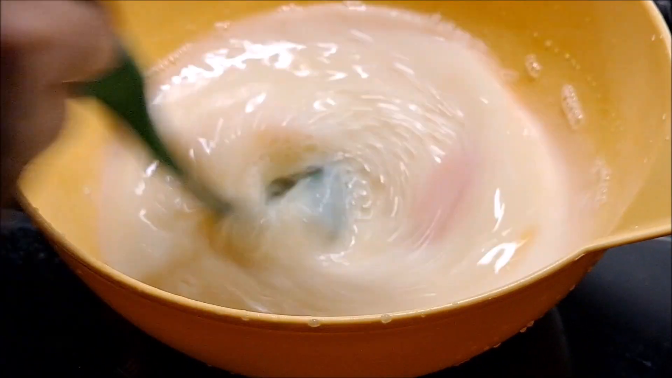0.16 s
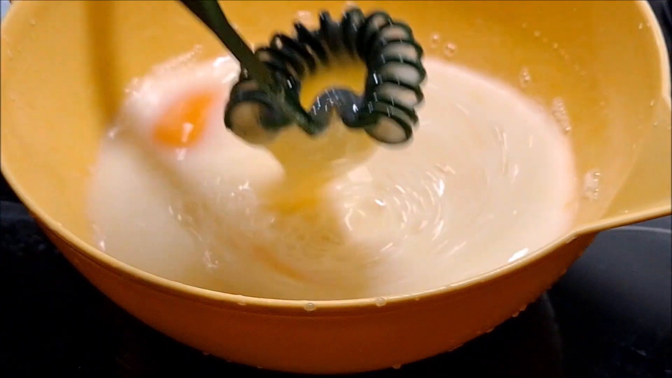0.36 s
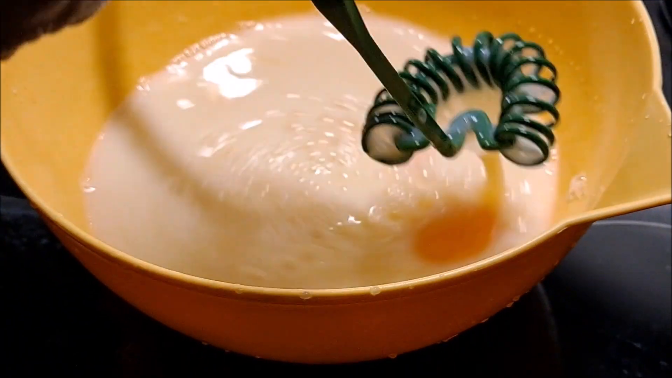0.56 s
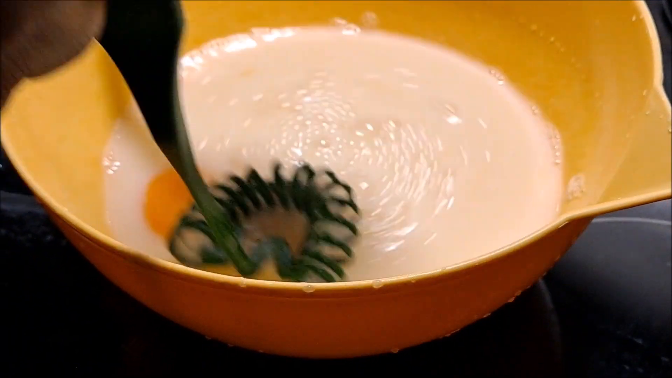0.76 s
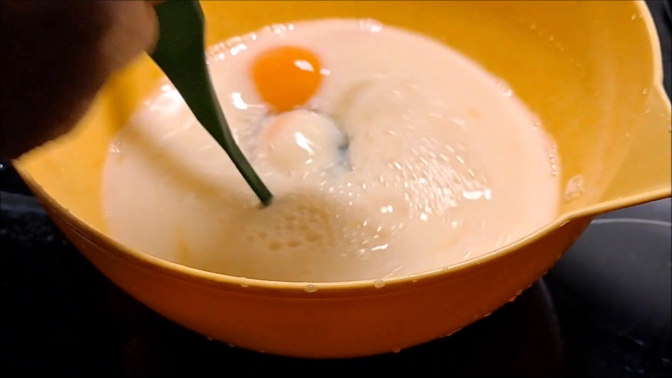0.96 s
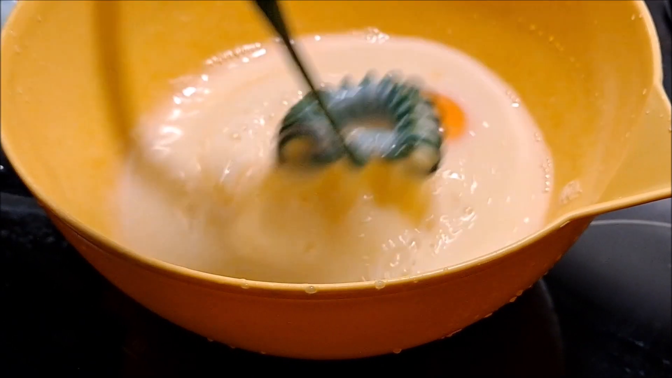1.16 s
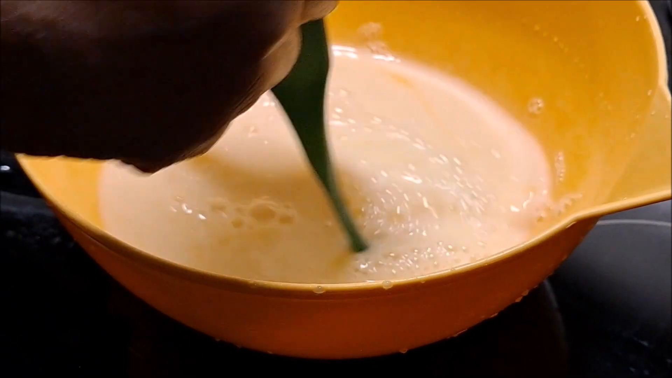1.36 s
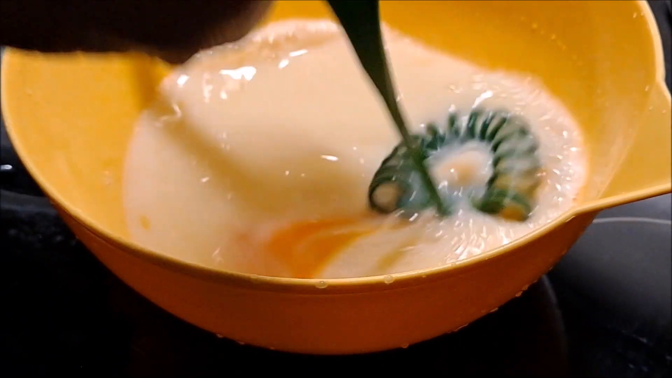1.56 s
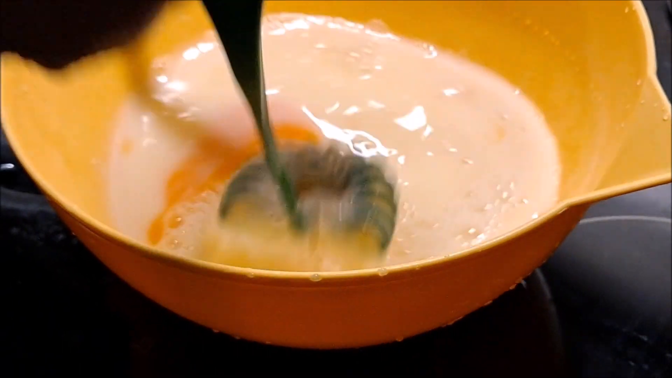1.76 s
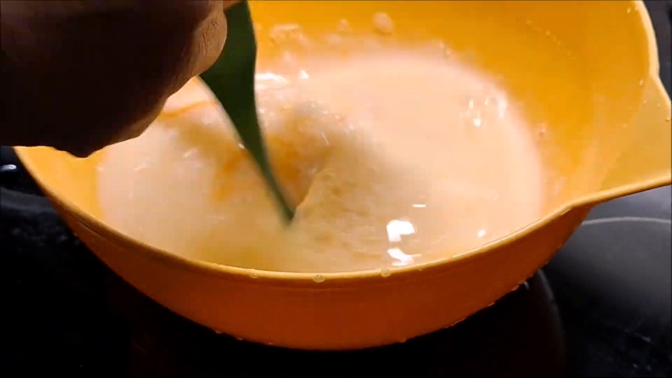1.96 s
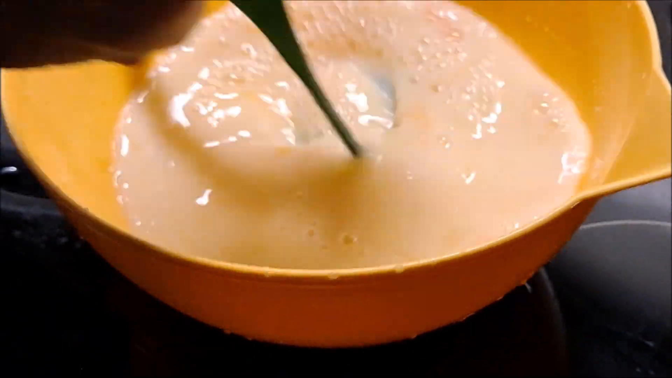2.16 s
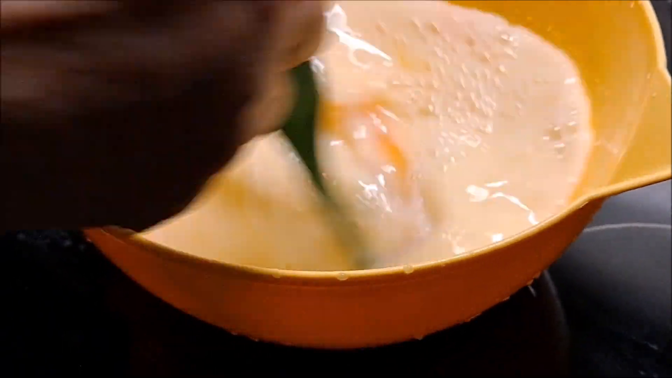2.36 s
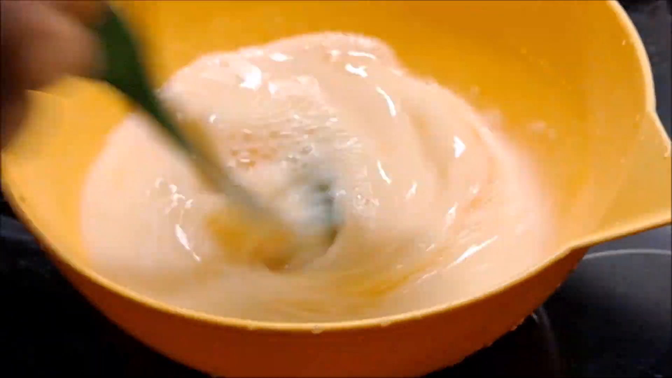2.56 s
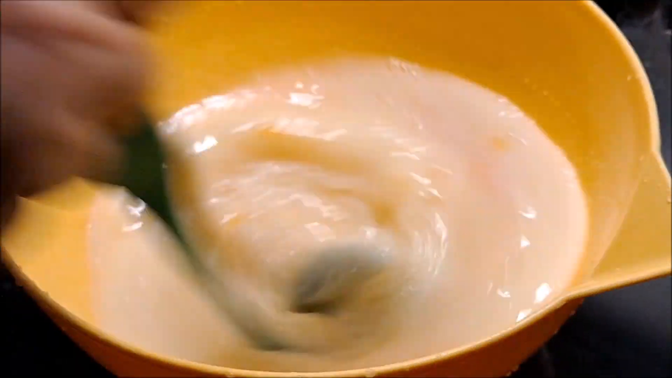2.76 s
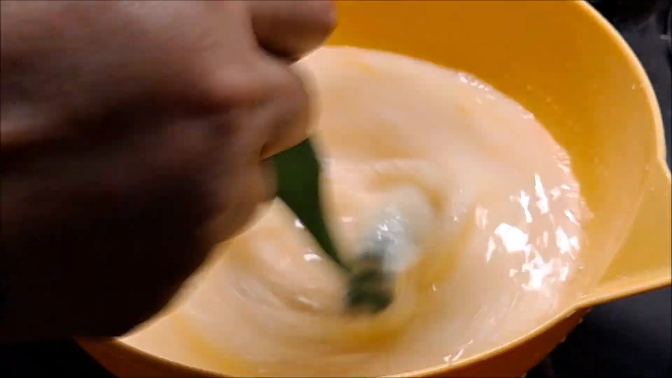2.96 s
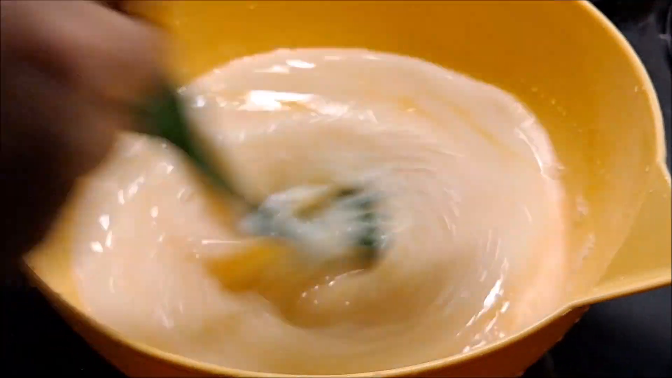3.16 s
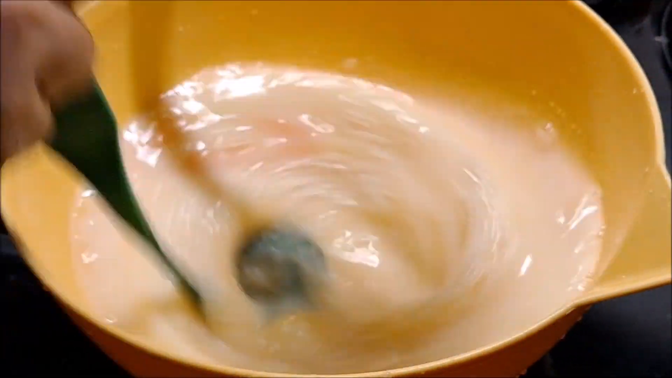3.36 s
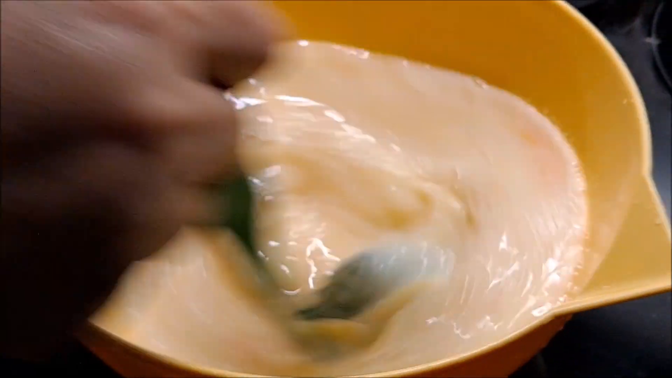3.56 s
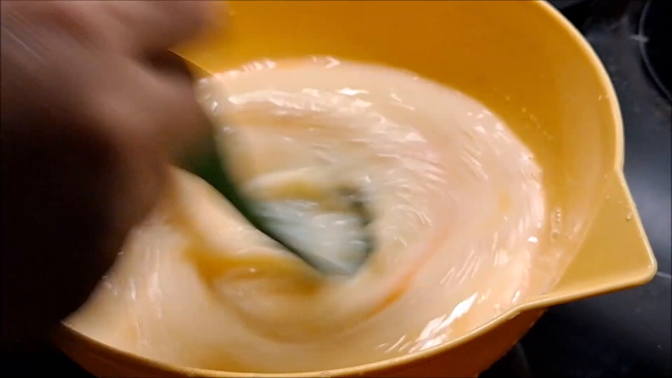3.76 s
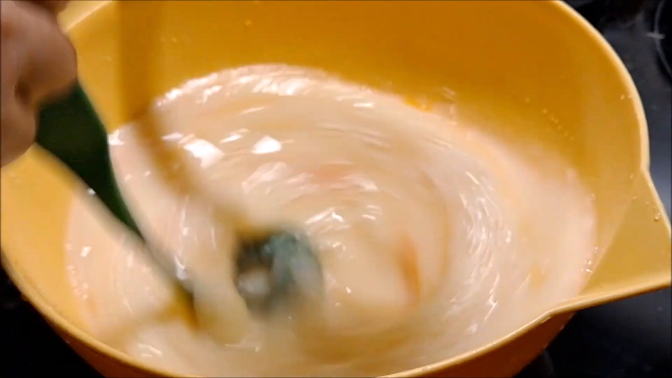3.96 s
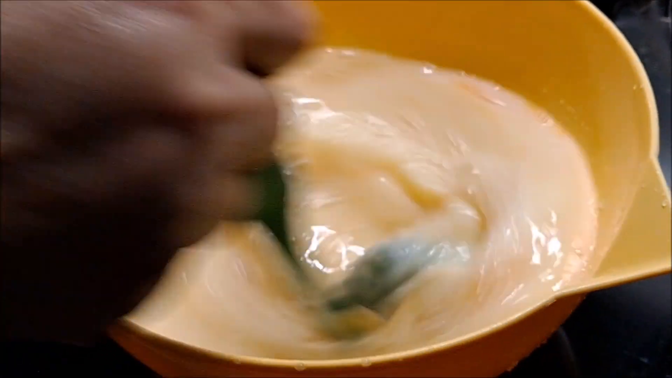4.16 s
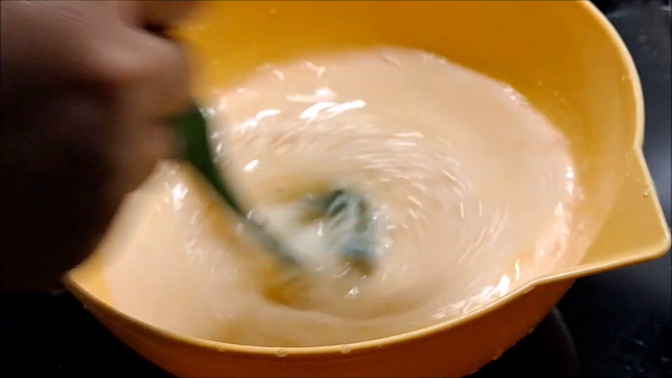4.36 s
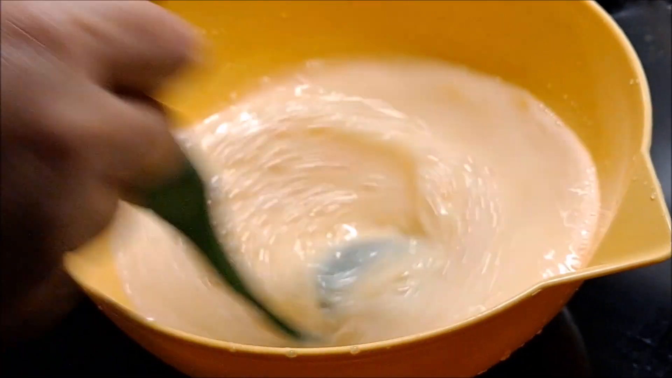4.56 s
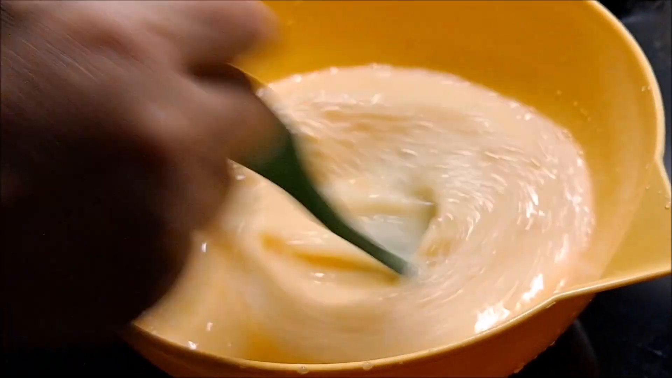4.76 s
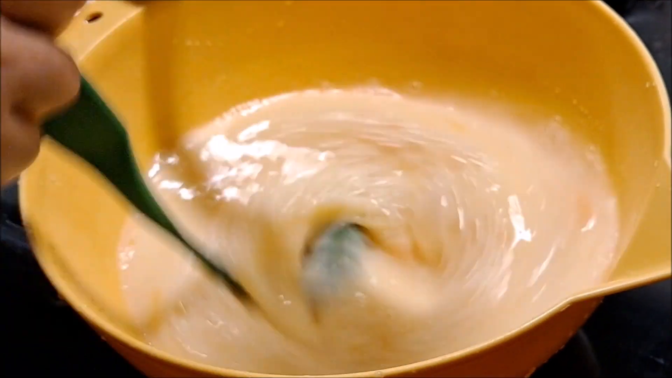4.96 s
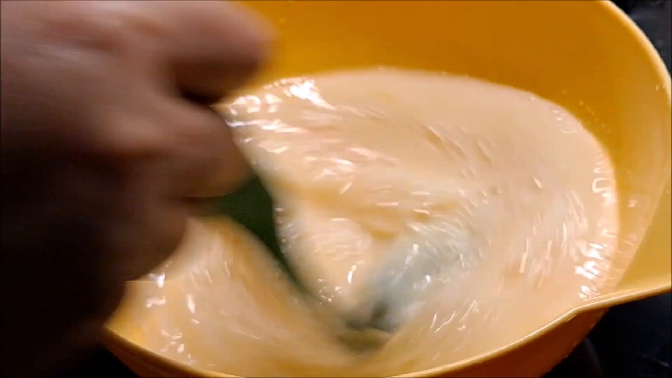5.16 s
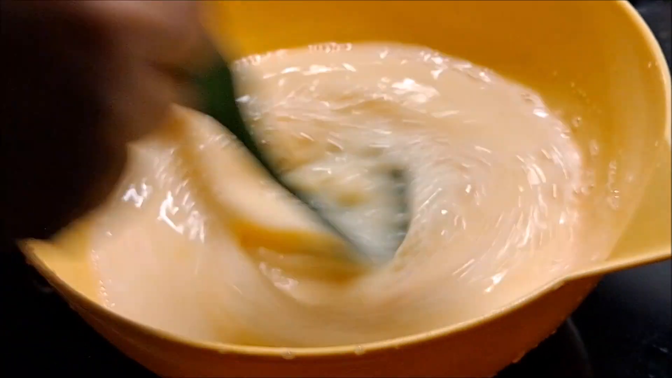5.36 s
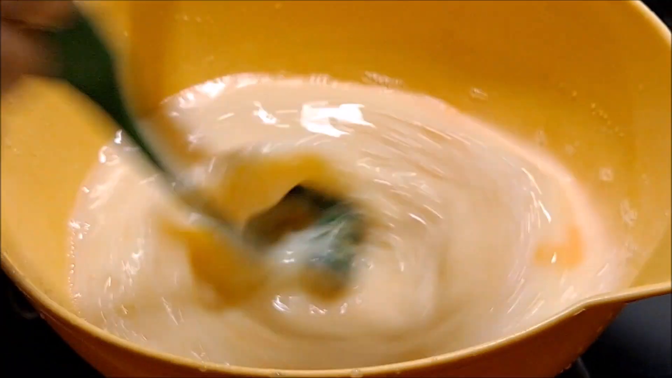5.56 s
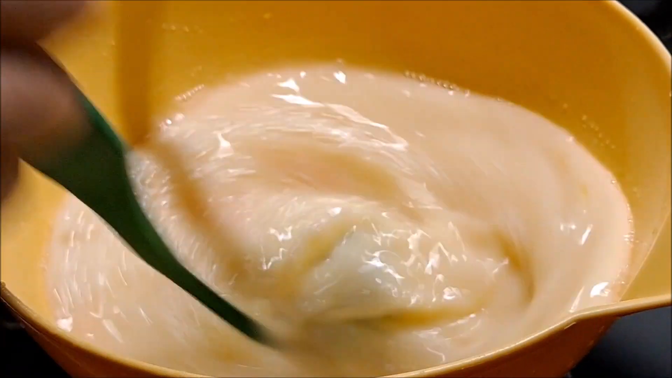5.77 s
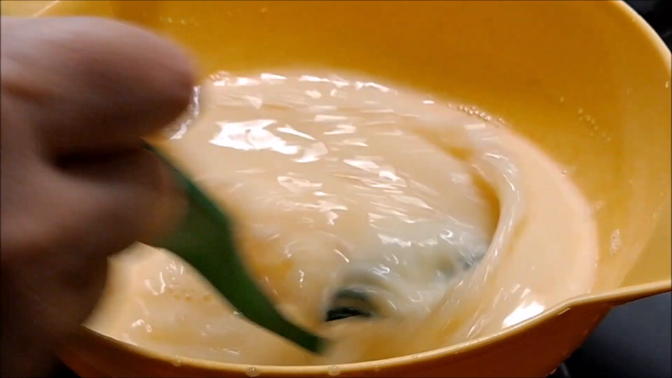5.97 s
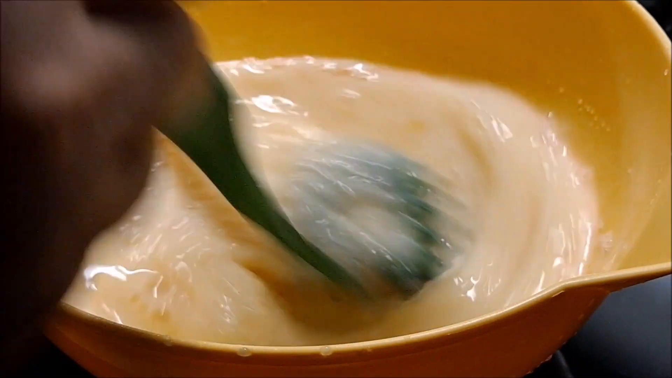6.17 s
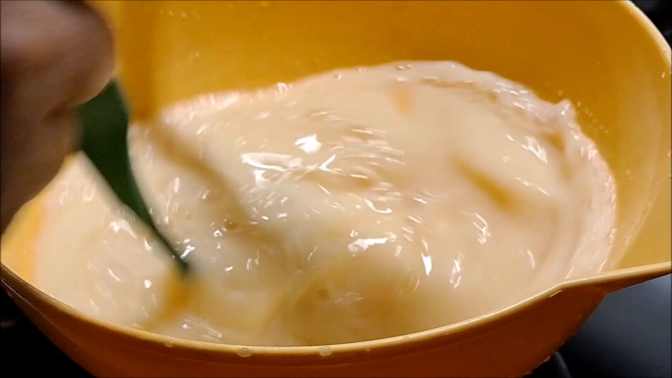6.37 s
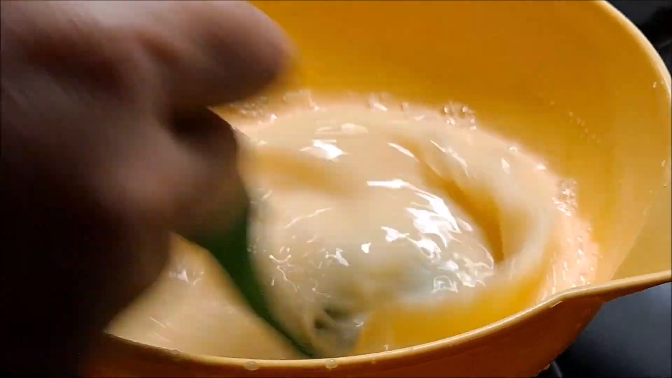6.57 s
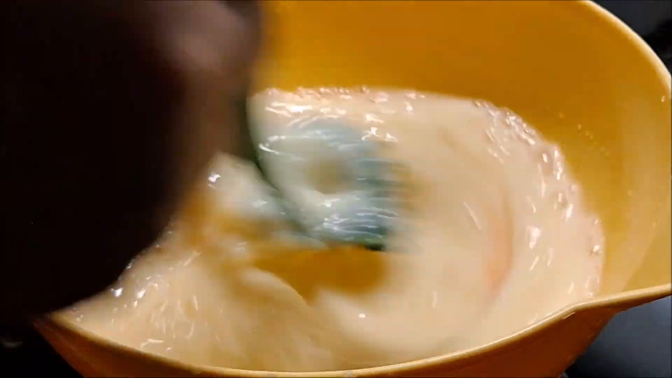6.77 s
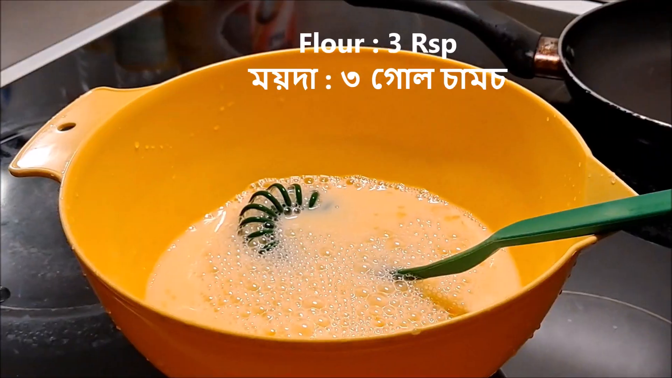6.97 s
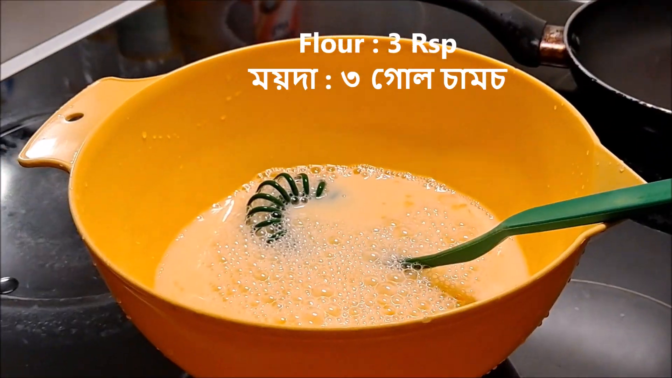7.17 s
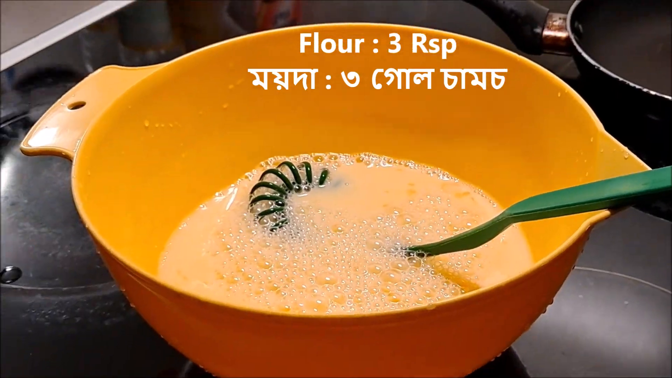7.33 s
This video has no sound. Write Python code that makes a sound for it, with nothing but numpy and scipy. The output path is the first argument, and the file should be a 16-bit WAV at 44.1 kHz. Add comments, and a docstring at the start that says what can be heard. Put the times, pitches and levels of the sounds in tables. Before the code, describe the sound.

A plastic whisk beats eggs and milk in a plastic bowl, with quick scrapes, rattling knocks and small wet glops.

```python
"""A coiled plastic whisk beats eggs and milk in a plastic bowl on a hob, heard close up in stereo. The coil
scrapes the wall and its loops knock it many times a second. Trapped air glops, and the bowl thuds against the
hob. Behind it a kitchen rumbles and whines faintly. Near the end the scene changes: the whisking is gone, a
different background takes over, and the resting bowl gives two faint clicks."""
import sys
import numpy as np
from scipy import signal
from scipy.fft import rfft, irfft, next_fast_len
from scipy.io import wavfile
from scipy.ndimage import uniform_filter1d, map_coordinates

SR = 44100
rng = np.random.default_rng(int(sys.argv[2]) if len(sys.argv) > 2 else 0)


def materialize(psi):
    """Save the field psi as 16-bit PCM at rate SR to the path in sys.argv[1].

    A 1-D psi becomes a single channel; in a 2-D psi each row is a channel.
    """
    bounded = np.clip(np.atleast_2d(psi).T, -1, 1)
    quanta = np.round(bounded * 32767).astype(np.int16)
    wavfile.write(sys.argv[1], SR, quanta)


N = 326325

# Levels in the tables are relative: the functions set the final loudness.
# Loops hitting the wall: t/s, tick level/dB, knock above tick/dB, treble above tick/dB, air pocket f/Hz
LOOP_KNOCKS = [(0.177, -19, -17.5, -10.5, 1350), (0.2367, -28.5, -9, -16, 890), (0.492, -74, -30, 3, 1500),
               (0.7213, -49, -38, -10.5, 1070), (1.0154, -36.5, -7, -1, 790),
               (1.338, -40.5, -26, -12, 1630), (1.367, -42, -17, -14, 870), (1.6831, -33, -12.5, -11, 745),
               (1.9624, -32.5, -1.5, -4, 1304), (2.0151, -32, -7.5, -31, 1560),
               (2.1955, -35, -45, -18, 1500), (2.2134, -36, -26, -15.5, 1500),
               (2.3216, -30.5, -23, -8, 1500), (2.339, -29.5, -3.5, -18.5, 910),
               (2.377, -28, -7, -7.5, 2000), (2.4357, -36, -21, -6, 1500), (2.4736, -25.5, -8, -14.5, 1620),
               (2.5077, -20, -13.5, -16, 1320), (2.542, -31, -18, -19, 1380),
               (2.6038, -36.5, -12.5, -15, 1300), (2.711, -25.5, -17, -16, 730),
               (2.753, -32.5, -6, -5.5, 1600), (2.779, -30.5, -9, -3, 1300), (2.8165, -30, -16, -8.5, 1500),
               (2.8603, -23.5, -15.5, -9.5, 1500), (2.8893, -20.5, -10, -12, 1590),
               (2.9853, -17.5, -19.5, -14, 980), (3.003, -24.5, -18.5, -18.5, 1500),
               (3.096, -26.5, -4, -6.5, 1190), (3.174, -26.5, -43, -6.5, 1500),
               (3.2047, -29.5, -2, -10, 1460), (3.237, -24, -14.5, -11.5, 1500),
               (3.295, -23, -15, -14, 1600), (3.3363, -20.5, -7.5, -16.5, 930),
               (3.3956, -34.5, -30, -18.5, 1500), (3.4489, -27.5, -23, -12, 1500),
               (3.465, -21.5, -14, -11, 1620), (3.511, -23.5, -14.5, -6, 1620),
               (3.5483, -29.5, -25, -5.5, 1500), (3.5643, -13, -10.5, -15, 1020),
               (3.6575, -32, -20.5, -10.5, 1500), (3.688, -12, -18.5, -21.5, 980),
               (3.7862, -22.5, -26, -11.5, 1500), (3.8001, -15, -18, -23.5, 1000),
               (3.826, -21.5, -18, -12, 1320), (3.903, -29.5, -15, -23.5, 1500),
               (3.929, -16, -13.5, -31.5, 1080), (3.9484, -15.5, -25.5, -16.5, 1370),
               (4.0136, -22.5, -25, -8.5, 1580), (4.0353, -22.5, -22, -19, 1500),
               (4.049, -19, -34, -23.5, 1640), (4.0626, -26.5, -16, -3, 1570),
               (4.1705, -12.5, -18, -31, 1880), (4.2774, -21.5, -7.5, -17.5, 1040),
               (4.3087, -24, -23, -10, 1890), (4.4266, -25, -13.5, -18.5, 1000),
               (4.4444, -24, -16, -9, 1460), (4.5591, -31.5, -18, -23.5, 1500),
               (4.576, -22.5, -10.5, -7.5, 1560), (4.6807, -28.5, -23.5, -20, 1500),
               (4.6978, -20, -27, -12, 1930), (4.783, -22, -13.5, -15, 1710), (4.819, -27.5, -8, -4, 1700),
               (4.8448, -28, -7, -21.5, 1430), (4.926, -29, -6.5, -19.5, 950),
               (4.9456, -21.5, -13.5, -15, 1380), (5.012, -25.5, -11.5, -6.5, 1660),
               (5.051, -18.5, -15, -22, 740), (5.0706, -24, -8.5, -7, 1620), (5.1223, -24, -19, -10, 1500),
               (5.146, -23.5, -10, -18, 1590), (5.168, -23, -13.5, -17.5, 1500),
               (5.19, -26, -13, -6.5, 1470), (5.3117, -20, -27, -15.5, 1710),
               (5.3664, -23, -14, -16.5, 1870), (5.431, -23.5, -15.5, -7.5, 1370),
               (5.486, -21.5, -17.5, -11, 1170), (5.55, -13.5, -19.5, -12, 1340),
               (5.601, -23.5, -13.5, -16, 1500), (5.6585, -20.5, -26, -9.5, 2000),
               (5.668, -16.5, -16.5, -11.5, 1570), (5.6871, -21, -8, -18, 1060),
               (5.7175, -19.5, -16, -13, 1690), (5.758, -32, -6, -13, 1430), (5.7803, -23, -12, -7.5, 1500),
               (5.7861, -14, -6, -7, 1426), (5.8006, -20.5, -5.5, -11, 1294),
               (5.8428, -23, -15.5, -12, 1740), (5.8967, -16, -11, -8.5, 1520),
               (5.9125, -12, -9.5, -12, 1070), (5.9553, -22, -17, -11, 1500),
               (6.008, -24.5, -8.5, -1.5, 1576), (6.0181, -12, -10.5, -16, 1360),
               (6.0326, -33.5, 9, -18.5, 1590), (6.0551, -23.5, -16.5, -14, 1500),
               (6.119, -31, -1, -10, 1610), (6.1383, -14.5, -8.5, -11, 1040), (6.238, -28.5, 3, -13, 1690),
               (6.255, -27.5, -1.5, -2.5, 1350), (6.284, -30, -11.5, -11.5, 1400),
               (6.3605, -17, -19.5, -8, 1330), (6.3805, -21.5, -2.5, -25, 944),
               (6.477, -34.5, -16.5, -25.5, 1500), (6.4893, -22, -13.5, -7, 1370),
               (6.595, -25.5, -9, -6, 1570), (6.6138, -19.5, -4.5, -10, 1550),
               (6.634, -29, -17, -12.5, 1700), (6.73, -20, -10, -10, 1500), (6.7409, -17, -6, -17.5, 1064),
               (6.776, -30, -2.5, -14, 1500), (6.8549, -16.5, -18, -6.5, 1540),
               (6.8694, -17.5, -7, -8, 1408)]
# Faint clicks from the resting bowl: same columns
RESTING_CLICKS = [(7.038, -48, 0, -3, 580), (7.137, -65.5, -11, 3.5, 593)]
# Strokes along the wall, and three light early drips:
# t/s, length/s, scrape level/dB, wall above scrape/dB, rumble above scrape/dB
STROKES_AND_DRIPS = [(0.001, 0.33, -41, -2, -5.5), (0.062, 0.091, -38.5, -5, -10),
                     (0.183, 0.073, -33.5, -4.5, -14.5), (0.734, 0.023, -64.5, -43, 6.5),
                     (0.965, 0.004, -62.5, -29, -14), (1.015, 0.003, -50, -1, 11.5),
                     (1.08, 0.013, -45.5, -3.5, -7.5), (1.302, 0.03, -57, -32, -3.5),
                     (1.357, 0.1, -57.5, 1, -1), (1.425, 0.018, -48.5, -1, 2.5),
                     (1.691, 0.003, -48, 3.5, 6), (1.735, 0.02, -51, -2.0, -10),
                     (1.96, 0.049, -47, 3.5, 2.5), (2.021, 0.017, -46, -5.5, -7),
                     (2.2, 0.084, -44, -5.5, -19), (2.315, 0.038, -38.5, -2.5, -29),
                     (2.437, 0.045, -39.5, -5.5, -18.5), (2.532, 0.028, -45, -1.5, -10.5),
                     (2.628, 0.0097, -36.5, 0, -7.5), (2.751, 0.182, -41, -0.5, -5),
                     (2.828, 0.12, -35.5, -2, -5), (2.976, 0.098, -38.5, -0.5, 0),
                     (3.102, 0.011, -32, -6.5, -3.5), (3.152, 0.13, -34, -2.5, -8),
                     (3.323, 0.095, -33, -4, -5), (3.442, 0.24, -37, -3.5, -10.5),
                     (3.568, 0.012, -31.5, -8.5, -2), (3.694, 0.085, -36.5, -4.5, -4.5),
                     (3.815, 0.0077, -31, -6.5, -1), (3.887, 0.082, -34.5, -7, -12.5),
                     (4.042, 0.24, -38.5, 0, -10), (4.157, 0.088, -36, -2, -11),
                     (4.292, 0.03, -37, -2, -22), (4.416, 0.011, -42, 4.5, -2),
                     (4.555, 0.016, -36, -5, -11), (4.68, 0.083, -40.5, -25, -1.5),
                     (4.792, 0.015, -36.5, -3, -18), (4.946, 0.093, -44.5, -1.5, -1.5),
                     (5.03, 0.11, -41, -4.5, -25), (5.141, 0.11, -35, -5.5, -9),
                     (5.302, 0.14, -38.5, -3, -5), (5.415, 0.092, -38.5, -1.5, -10),
                     (5.535, 0.076, -37, -1.5, -10.5), (5.662, 0.25, -36, -6.5, -7),
                     (5.785, 0.0083, -25.5, -4, -9.5), (5.906, 0.0086, -30.5, 1.5, -5.5),
                     (6.018, 0.074, -38, -10, -3.5), (6.13, 0.047, -33.5, -0.5, -10),
                     (6.237, 0.049, -34, -4, -4), (6.363, 0.044, -33, -5, -8),
                     (6.482, 0.035, -32.5, -4, -3.5), (6.605, 0.054, -32.5, -5.5, -5),
                     (6.724, 0.074, -34, -7, -14), (6.859, 0.1, -36.5, -4, -1.5)]
# The mix swirling between strokes: t/s, scrape level/dB, wall above scrape/dB, rumble above scrape/dB
MIX_SWIRL = [(2.15, -77, -8, 16), (2.3, -46, -1.5, -14), (2.6, -40.5, -6.5, -2.5), (3.2, -50, -2, -12.5),
             (3.9, -38, -4.5, -5.5), (4.5, -42, -3, -7), (5.1, -42, 1, -1), (5.5, -54.5, -18.5, -14.5),
             (5.9, -43.5, -1, -3.5), (6.1, -57, -0.5, -28.5)]
# Four pitches ("modes") of the coil's main ring, then three close ringing pitches near 4.3 kHz:
# f/Hz, width/Hz, level/dB
COIL_MODES = [(2490, 90, 0.5), (2730, 147, 4.5), (3190, 1340, -1), (5730, 2740, -8), (4125, 240, 6),
              (4330, 130, 9), (4477, 120, 6.5)]
# How freely the three close pitches ring when out of the mix, which muffles them: t/s, level/dB
COIL_FREEDOM = [(0, 0.5), (.75, 7), (1.1, 0.5), (1.7, 2.5), (2.3, 0), (2.7, 2), (2.95, 5), (3.15, -1),
                (3.5, 1.5), (3.8, 1.5), (4.1, 0), (4.4, 4), (4.6, 2), (4.7, -2.5), (4.8, 8.5), (5, 1),
                (5.3, 1), (5.6, 0), (5.8, -3), (6.1, -2.5), (6.4, -0.5), (6.7, -6), (6.9, 2)]
# Pitches the bowl's wall rings at: f/Hz, width/Hz, level/dB
WALL_MODES = [(562, 192, -9), (730, 100, -3), (952, 175, -4), (1253, 257, -2), (1424, 166, 0),
              (1607, 54, 3), (1930, 334, -3.5)]
# Low pitches of the bowl on the hob: f/Hz, width/Hz, level/dB
BASE_MODES = [(137.3, 36.5, -1), (175.3, 25, 1.5), (213.5, 36, 1.5), (272.4, 14.1, 0), (326, 32, -8.5)]
# Dry treble of plastic touching plastic: f/Hz, level/dB
FIZZ_SPECTRUM = [(2940, -24.5), (5000, 0.5), (8970, -5), (11900, -12.5), (13500, -11), (16000, -14.5)]
# How alike the whisk sounds on the left and right: f/Hz, likeness (1 = the same)
WHISK_LIKENESS = [(60, 0.79), (180, 1), (550, 0.88), (1650, 0.59), (4970, 0.19), (15000, 0.15)]
# How much louder the whisk is on the left: f/Hz, level/dB
WHISK_BALANCE = [(60, -4), (380, 0.5), (2380, 2.5), (15000, 1.5)]
# Kitchen noise during the whisking: f/Hz, level/dB
KITCHEN_DURING = [(25, -38.5), (60, -32.5), (90, -17.5), (130, -7.5), (217, -5), (340, -12.5), (520, -21),
                  (900, -35), (1500, -44.5), (5000, -44.5), (16000, -53)]
# Kitchen noise after the scene changes: f/Hz, level/dB
KITCHEN_AFTER = [(25, -34), (60, -16), (150, 0.5), (230, 0.5), (500, -12), (1100, -19.5), (1500, -27.5),
                 (3500, -28), (5200, -26.5), (7500, -32.5), (10500, -28.5), (16000, -38)]
# How alike the kitchen sounds on the left and right: f/Hz, likeness (1 = the same)
KITCHEN_LIKENESS = [(60, 1), (290, 0.94), (1400, 0.33), (3100, 0)]
# How much louder the kitchen is on the left: f/Hz, level/dB
KITCHEN_BALANCE = [(60, -6.5), (200, -7.5), (700, -2), (2000, 0.5)]
# Thin tones of appliances: f/Hz, level/dB, wavering/dB
APPLIANCE_TONES = [(1086, -87, .5), (5722, -94, 4), (9550, -104, 1)]

SCENE_CHANGE_S = 6.929  # the scene changes here: the whisking gives way to a quieter scene
ATTACK_DB_PER_S, SAG_DB_PER_S, RELEASE_DB_PER_S = 1758.5, 39, 406.5  # a scrape starts, drags, lets go
LIFT_S, LIFT_WIDTH_S, LIFT_DB = 0.0096, 0.007, -1  # the coil lifts just before a stroke: a small dip
KNOCK_RISE_S, KNOCK_FALL_S, CLICK_S = 0.002, 0.0019, 0.00061  # time to swell or fade by 2.43 dB
HOLLOW_HZ, RUMBLE_TOP_HZ, TOP_HZ = 985, 700, 15900


def whisk():
    """Scrapes and knocks make a rough force that rings the coil, the bowl's wall and its base."""
    scrape, hiss, rub, rumble = stirring()
    slips = chatter(per_s=110, spread_db=-1.5, fade_s=0.043, steady=2.5)
    slips *= chatter(per_s=160, spread_db=3, fade_s=0.0066, steady=1.4)  # single loops tick past
    contacts = [(*row, KNOCK_RISE_S, KNOCK_FALL_S) for row in LOOP_KNOCKS]
    contacts += [(*row, CLICK_S, CLICK_S) for row in RESTING_CLICKS]
    (tick, knock, treble), (coil_taps, wall_taps, fizz_taps, base_taps) = knocks(contacts)

    def force(hit_power, hit_db, stroke, drag_db):
        """Noise that follows the hits and the drag; each part adds slips of its own."""
        drag = stroke * slips * chatter(per_s=65, spread_db=0.5, fade_s=0.023, steady=1.1)
        drag *= amp(drag_db + 1.74 * wobble(30))
        return np.sqrt(hit_power * amp(hit_db) ** 2 + drag ** 2) * rng.standard_normal((2, N))

    coil = resonate(force(tick, -13, scrape, -3) + coil_taps, COIL_MODES[:4])
    ring = resonate(force(tick, -17, scrape, -7.5) + coil_taps, COIL_MODES[4:])
    ring *= amp(np.interp(np.arange(N) / SR, *np.transpose(COIL_FREEDOM)))
    wall = resonate(force(knock, -10, rub, -3.5) + wall_taps, WALL_MODES)
    fizz_force = force(treble, -2.7, hiss, -5.5) + fizz_taps
    fizz = filtered(fizz_force, lambda hz: unit(amp(curve(FIZZ_SPECTRUM, hz))))
    # heavy knocks also push the whole bowl against the hob
    push = rumble * amp(-4.5 + 1.8 * wobble(25)) + amp(-15) * np.sqrt(knock)
    base = resonate(push * rng.standard_normal((2, N)) + base_taps, BASE_MODES)
    liquid = air_pockets(contacts) + scrape * bubbles()
    return patchy(coil + ring + wall + fizz, depth_db=2) + base + np.array([[1], [0.3]]) * liquid


def stirring():
    """The coil drags on the wall, the mix swirls and drips: strength of scrape, hiss, rub, rumble."""
    t = np.arange(0, N, 32) / SR
    starts, lengths, db, wall_db, rumble_db = np.transpose(STROKES_AND_DRIPS)
    swirl_times, swirl_db, swirl_wall_db, swirl_rumble_db = np.transpose(MIX_SWIRL)
    since = t[:, None] - starts
    lift = amp(LIFT_DB * np.exp(-((since + LIFT_S) / LIFT_WIDTH_S) ** 2).sum(axis=1))

    def strength(peak_db, between_db, lag_s=0, pace=1):
        """Strokes and drips over the swirl; a pace below 1 makes them come and go more slowly."""
        age = since - lag_s
        fade_db = SAG_DB_PER_S * np.minimum(age, lengths)
        fade_db += RELEASE_DB_PER_S * np.maximum(age - lengths, 0)
        drop_db = np.where(age < 0, -age * ATTACK_DB_PER_S, fade_db)
        swirl = amp(np.interp(t, swirl_times, between_db, left=-120, right=-120))
        power = (amp(peak_db - pace * drop_db) ** 2).sum(axis=1) + swirl ** 2
        return np.interp(np.arange(N) / SR, t, np.sqrt(power) * lift) * (np.arange(N) < SCENE_CHANGE_S * SR)

    scrape = strength(db, swirl_db)
    hiss = strength(db, swirl_db, pace=0.85)
    # the wall answers a little late; the heavy bowl follows late and slowly
    rub = strength(db + wall_db, swirl_db + swirl_wall_db, lag_s=0.005)
    rumble = strength(db + rumble_db, swirl_db + swirl_rumble_db, lag_s=0.0033, pace=0.62)
    return scrape, hiss, rub, rumble


def chatter(per_s, spread_db, fade_s, steady):
    """The loops slip at random over a steady drag; each slip dies by 60 dB in fade_s."""
    slips = (rng.random(N) < per_s / SR) * amp(spread_db * np.minimum(rng.exponential(size=N), 2))
    fading = signal.lfilter([1], [1, -amp(-60 / (fade_s * SR))], slips)
    return unit(fading + steady)


def knocks(contacts):
    """Each contact swells, clicks and fades: its power in three parts, and its sharp taps in four."""
    lead = 1800  # samples of swell before the peak
    t = np.arange(-lead, 3 * lead) / SR
    click = 1 + np.exp(-(t / 0.00072) ** 2)
    powers = np.zeros((3, N + SR))  # tick, knock, treble
    taps = np.zeros((4, 2, N))  # coil, wall, fizz, base
    for s, db, knock_db, treble_db, _, rise_s, fall_s in contacts:
        blow = click * amp(db - 2.43 * np.where(t < 0, (t / rise_s) ** 2, t / fall_s))
        peak = round((s + rise_s) * SR)
        powers[:, peak:peak + len(t)] += (blow * amp([[0], [knock_db], [treble_db]])) ** 2
        tap_db = db + np.array([[3], [knock_db + 9], [treble_db + 9], [knock_db + 9]])
        taps[:, :, peak] = amp(tap_db) * rng.normal([1, 0], [0.3, 0.7])
    return powers[:, lead:lead + N], taps


def air_pockets(contacts):
    """Each contact rings a pocket of air in the mix, and the hollow of the bowl adds a round plop."""
    pockets, plops = [], []
    for s, db, knock_db, _, hz, rise_s, _ in contacts:
        pockets.append((s, db + knock_db + 1, hz, 0.05))
        plops.append((s + rise_s, db + knock_db - 5.5, HOLLOW_HZ * rng.normal(1, 0.045), 0.035))
    return glops(pockets + plops)


def bubbles(count=700):
    """Small bubbles ring at random times; the higher ones die sooner."""
    when, faintness, pitch = rng.random((count, 3)).T
    db = 1.5 + 4.5 * pitch - 15 * faintness
    return glops(zip(when * N / SR, db, 800 * 5.5 ** pitch, 0.05 * 0.6 ** pitch))


def glops(rows):
    """Trapped air rings briefly with rising pitch. Rows: t/s, level/dB, f/Hz, 60 dB fade time/s."""
    out = np.zeros(N + SR)
    for s, db, hz, fade_s in rows:
        t = np.arange(int(fade_s * SR)) / SR
        shape = amp(db - 60 * t / fade_s) * (1 - np.exp(-t / 0.00077))
        cycles = hz * (t + 0.089 * t * t / fade_s)
        out[round(s * SR):][:len(t)] += shape * np.sin(2 * np.pi * cycles)
    return out[:N]


def room_echo(x, count=2, sway_hz=1.2):
    """Hard kitchen walls send back a short echo that changes as the whisk moves."""
    out = 0
    sway = 2 * np.pi * sway_hz * np.arange(N) / SR
    for k in range(count):
        hz, t, noise = signal.stft(rng.standard_normal((2, SR // 6)), SR, nperseg=256)
        fade_s = curve([(200, 0.089), (3000, 0.15), (12000, 0.085)], hz)
        tail = signal.istft(noise * amp(-60 * t / fade_s[:, None]), SR)[1]
        share = np.abs(np.cos(sway + np.pi * k / count))
        late = np.pad(x * share, ((0, 0), (200, 0)))  # the nearest wall is a few ms away
        out = out + signal.oaconvolve(late, tail / np.linalg.norm(tail[0]), axes=1)[:, :N]
    return out


def kitchen(spectrum, db, swell_db):
    """A low rumble swells and sinks under a faint, even hiss."""
    air = unit(filtered(rng.standard_normal((2, N)), lambda hz: amp(curve(spectrum, hz))))
    rumble = filtered(air, lambda hz: 1 / (1 + (hz / RUMBLE_TOP_HZ) ** 4))
    hiss = air - rumble
    rumble *= amp(swell_db * wobble(6.8))
    return amp(db) * stereo(hiss + rumble, KITCHEN_LIKENESS, KITCHEN_BALANCE)


def appliance_whines():
    """Appliances give off thin tones that waver in strength and a little in pitch."""
    t = np.arange(N) / SR
    out = np.zeros(N)
    for hz, db, waver_db in APPLIANCE_TONES:
        strength = amp(db + 6 + waver_db * wobble(9.5))
        jitter = 0.43 * (hz / 2500) ** 0.6 * wobble(50)
        out += strength * np.sin(2 * np.pi * hz * t + jitter)
    return out


def amp(db):
    """Turn a level in dB into a number to multiply by."""
    return np.exp(np.asarray(db) * (np.log(10) / 20))


def unit(x):
    """Scale x to an average power of 1."""
    return x / np.sqrt(np.mean(x ** 2) + 1e-20)


def curve(points, hz):
    """Read between (f/Hz, value) points, giving each octave about equal room."""
    f, values = np.transpose(points)
    return np.interp(np.log(hz + 1), np.log(f + 1), values)


def wobble(per_s):
    """A smooth curve through per_s random values a second."""
    at = np.arange(0, N + 64, 64)
    smooth = map_coordinates(rng.standard_normal(400), [at * per_s / SR])
    return np.interp(np.arange(N), at, smooth)


def filtered(x, response):
    """Scale and delay each frequency in x as response(hz) says."""
    size = next_fast_len(N + SR // 10)
    return irfft(rfft(x, size) * response(np.fft.rfftfreq(size, 1 / SR)), size)[..., :N]


def resonate(force, modes):
    """A force rings an object at its own pitches; white noise would keep its power."""
    def response(hz):
        total = sum((-1) ** k * amp(db) * width * hz / (hz * width - 1j * (centre ** 2 - hz ** 2))
                    for k, (centre, width, db) in enumerate(modes))
        return total / np.sqrt(np.mean(np.abs(total) ** 2))
    return filtered(force, response)


def patchy(x, depth_db):
    """Now one range of pitches stands out, now another, at random."""
    bands = signal.stft(x, nperseg=256)[2]
    patches = uniform_filter1d(rng.standard_normal(bands.shape[1:]), size=4, axis=0)  # over pitch
    patches = uniform_filter1d(patches, size=7, axis=1)  # over time
    return signal.istft(bands * amp(depth_db * unit(patches)), nperseg=256)[1][:, :N]


def stereo(pair, likeness, balance, lead_s=0):
    """Blend two signals into left and right; the left arrives lead_s earlier."""
    def shares(hz):
        angle = np.arccos(curve(likeness, hz)) / 2
        return np.array([np.cos(angle), np.sin(angle)])
    mid, side = filtered(pair, shares)
    half = np.array([[0.5], [-0.5]])
    return filtered(np.array([mid + side, mid - side]),
                    lambda hz: amp(half * curve(balance, hz)) * np.exp(2j * np.pi * half * hz * lead_s))


def scene():
    """Whisk, echo and kitchen; at SCENE_CHANGE_S the scene changes to the resting bowl and a new background."""
    t = np.arange(N) / SR
    before = np.clip((SCENE_CHANGE_S - t) / 0.012, 0, 1)
    after = 1 - before
    bowl = stereo(whisk(), WHISK_LIKENESS, WHISK_BALANCE, lead_s=0.00008)
    resting_bowl = (t > SCENE_CHANGE_S + 0.05) * bowl
    whisking = bowl + amp(-12.5) * room_echo(bowl) + kitchen(KITCHEN_DURING, db=-59.5, swell_db=3.5)
    whines = amp(-3 * after) * appliance_whines()
    still_kitchen = patchy(kitchen(KITCHEN_AFTER, db=-62.5, swell_db=0.5), depth_db=1.5)
    return before * whisking + resting_bowl + after * still_kitchen + whines


def record(dry):
    """The microphone loses the bass below about 50 Hz, and nothing above TOP_HZ is kept."""
    return filtered(dry, lambda hz: (1j * hz / (50 + 1j * hz)) ** 2 * (hz < TOP_HZ))


dry = scene()
out = record(dry)
materialize(out)
```